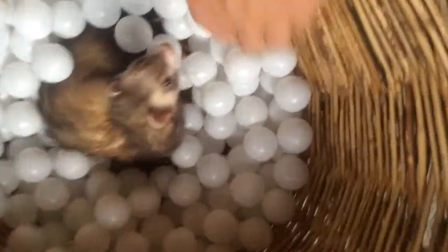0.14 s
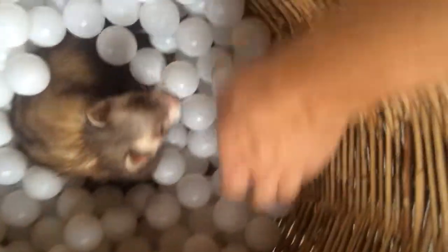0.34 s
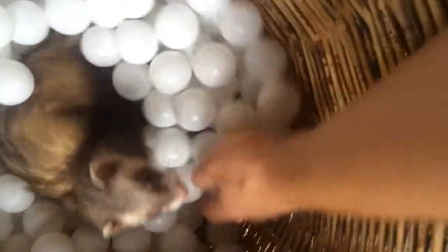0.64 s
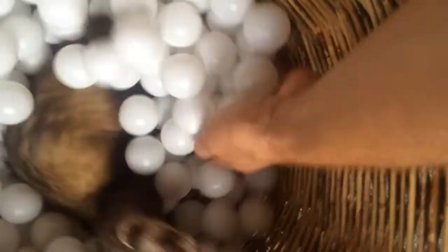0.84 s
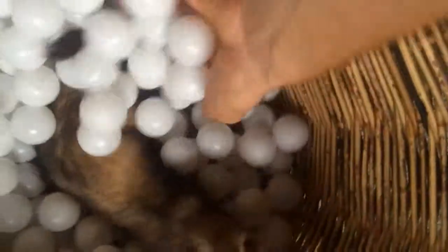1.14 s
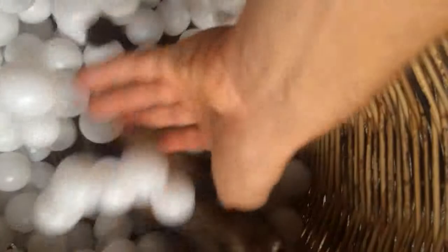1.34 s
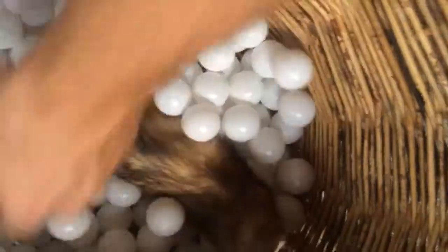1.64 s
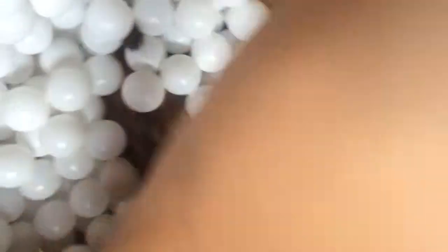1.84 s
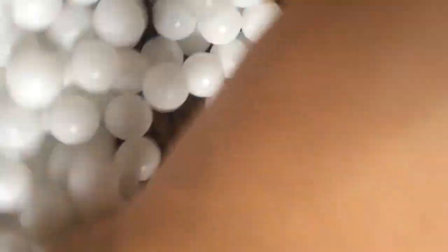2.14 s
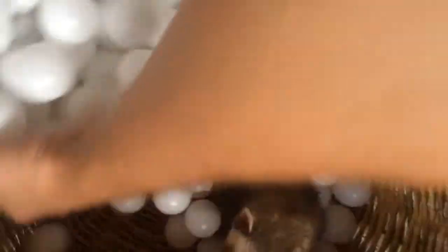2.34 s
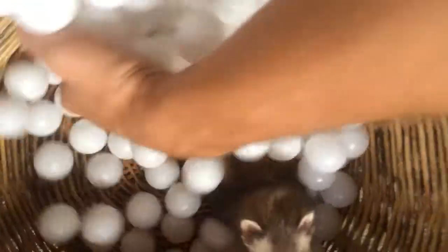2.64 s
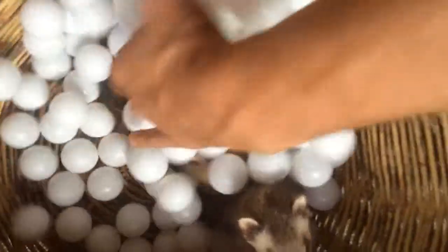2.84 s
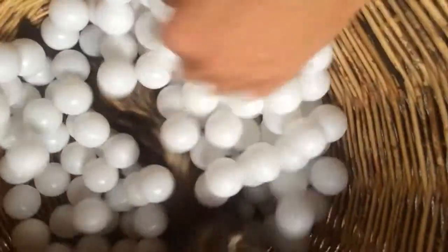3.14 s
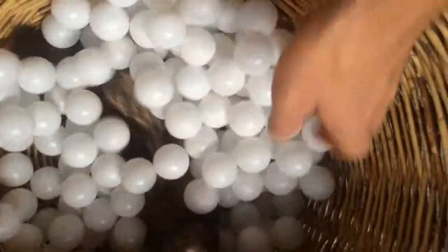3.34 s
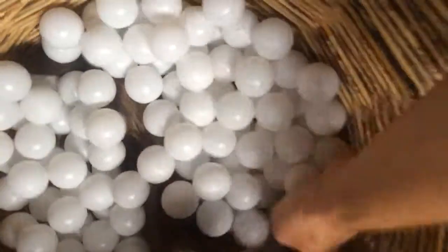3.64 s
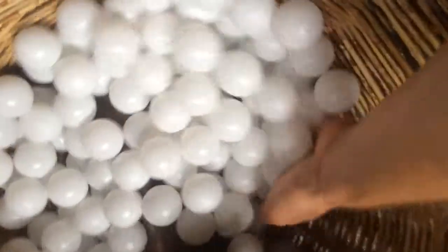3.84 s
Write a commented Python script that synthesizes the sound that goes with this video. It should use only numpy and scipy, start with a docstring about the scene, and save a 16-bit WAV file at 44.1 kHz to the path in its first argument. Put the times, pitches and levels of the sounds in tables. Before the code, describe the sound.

Hollow plastic balls, nearly quiet at first, then clatter and scrape in a dense rattle as a hand stirs them in a wicker basket; close microphone, small quiet room with short reflections.

```python
"""Hollow plastic balls knock and scrape as a hand stirs them in a wicker basket, close by, in a small room.
Each collision is a knock of about two cycles (damped body modes) with a brief high ring of the thin shell.
Between knocks the balls scrape in tiny slips: random impulses through a fixed colour.
Now and then a clump gives way and tumbles, or one ball scuffs its neighbour; one squeak rises briefly.
The basket thuds faintly (coloured noise); basket and room reflect the balls, over quiet room tone."""
import sys
import numpy as np
from scipy import signal
from scipy.io import wavfile
from scipy.ndimage import uniform_filter1d

SR = 44100
rng = np.random.default_rng(int(sys.argv[2]) if len(sys.argv) > 2 else 0)


def master(y):
    """Save y as 16-bit WAV."""
    cut = np.clip(np.atleast_2d(y).T, -1, 1)
    pcm = np.round(cut * 32767)  # scale
    wavfile.write(sys.argv[1], SR, pcm.astype(np.int16))


N = 176400  # samples, 4 s

# Room tone spectrum. Each row: frequency in Hz, relative level in dB.
ROOM_TONE_COLOUR = [(20, -30), (60, -12), (185, -3), (270, -12), (800, -5), (1300, -18), (3300, -21.5),
                    (5200, -31), (9000, -22), (15500, -31)]
ROOM_TONE_RMS_DB = -58.5

# Basket thudding over time. Each row: time in seconds, level in dB.
THUD_LEVEL = [(0, -59.5), (.48, -59), (.75, -56), (1.6, -54), (2.06, -55), (2.105, -44), (2.25, -58),
              (2.6, -53), (3.4, -57), (3.56, -65), (3.7, -58), (4, -59)]
# Basket thud spectrum. Each row: frequency in Hz, relative level in dB.
THUD_SPECTRUM = [(20, -16), (42, -24), (60, 3.5), (85, -6.5), (125, -1), (200, -2.5), (400, -31),
                 (2000, -57)]

# Reflections: level in dB, decay by 60 dB in seconds, first delay in seconds.
BASKET_DB, BASKET_T60_S, BASKET_DELAY_S = -8, 0.1, 0.0015
ROOM_DB, ROOM_T60_S, ROOM_DELAY_S = -12.5, 0.19, 0.013
WANDER_S = 0.02  # the balls move, so their reflections keep changing

# How hard the pile is stirred. Each row: time in seconds, knocking level in dB, scraping level in dB.
STIRRING = [(0, -51.5, -54), (.11, -58, -52.5), (.17, -50.5, -57), (.24, -62, -66), (.51, -64, -71),
            (.522, -41, -45.5), (.565, -34, -37.5), (.68, -32.5, -32.5), (.8, -31.5, -29.5),
            (.92, -30, -33.5), (1.18, -32, -32), (1.33, -32.5, -38), (1.41, -35.5, -40.5), (1.49, -40, -42),
            (1.54, -38.5, -47), (1.59, -31.5, -36.5), (1.69, -40.5, -42.5), (1.79, -51, -56.5),
            (1.86, -49, -48), (1.945, -37, -41), (1.98, -27.5, -30), (2.04, -31, -40), (2.08, -34.5, -41.5),
            (2.125, -24, -23), (2.2, -23, -24), (2.28, -29.5, -25), (2.33, -31, -30), (2.52, -31.5, -34),
            (2.66, -34, -30), (2.92, -33, -34.5), (3.06, -32, -36), (3.19, -31.5, -31.5),
            (3.32, -30, -34.5), (3.45, -37, -41), (3.55, -44, -49.5), (3.625, -47, -50.5),
            (3.67, -34.5, -38), (3.71, -28.5, -38.5), (3.82, -34.5, -34.5), (3.94, -36, -34),
            (4, -25.5, -37)]
# Clumps of balls giving way. Each row: start in seconds, level in dB, length in seconds.
CLUMP_TUMBLES = [(0.125, -53, 0.034), (0.558, -33.5, 0.013), (1.245, -28, 0.0089), (1.354, -35.5, 0.036),
                 (1.4225, -31.5, 0.006), (1.505, -27.5, 0.017), (1.547, -27.5, 0.013), (1.564, -22, 0.011),
                 (1.83, -33.5, 0.0073), (2.265, -27.5, 0.012), (2.411, -27.5, 0.0076), (2.679, -31, 0.0074),
                 (2.782, -27.5, 0.0076), (2.884, -28, 0.011), (3.084, -29, 0.013), (3.115, -26, 0.0089),
                 (3.224, -29.5, 0.0067), (3.632, -35, 0.0081), (3.649, -31.5, 0.0083),
                 (3.685, -28.5, 0.0085)]
# One ball scuffing along its neighbour. Each row: start in seconds, level in dB, length in seconds.
BALL_SCUFFS = [(.043, -55, 0.0089), (.064, -47.5, 0.016), (.1215, -36.5, 0.0095), (.153, -48, 0.015),
               (.294, -53, 0.015), (.421, -58, 0.0039), (.994, -23, 0.0053), (1.009, -26.5, 0.0032),
               (1.075, -32, 0.0041), (1.18, -26, 0.0033), (1.594, -36, 0.007), (2.413, -23, .004),
               (2.642, -28, 0.004), (2.835, -25.5, 0.0022), (2.953, -25.5, 0.0076), (3.224, -30.5, 0.0065)]
SURGE_RISE = 0.25  # swell, as a share of the surge length
TUMBLE_SCRAPE_DB = -1.5  # scraping relative to knocking in a tumble

# Contact rates at full stir.
FULL_STIR_DB, KNOCKS_PER_S, SLIPS_PER_S = -29.5, 950, 6000
CROWDING = 0.7  # contact rate grows as this power of the stirring amplitude
KNOCK_SCATTER_DB, SLIP_SCATTER_DB, SLIP_CLUMP_DB = 2, 2, 3

SQUEAK_START_S, SQUEAK_LENGTH_S, SQUEAK_PEAK_DB = 3.483, 0.009, -35
SQUEAK_MID_HZ, SQUEAK_RISE = 3200, 0.1  # rise as a share of the middle frequency

# Modes of a reference ball's hollow body, retuned for each ball.
# Each row: frequency in Hz, level in dB, swell time in seconds.
BODY_MODES = [(1020, -2.5, .0009), (1850, -13, .0005)]
BODY_HZ, BODY_SWELL_S = BODY_MODES[0][0], BODY_MODES[0][2]
# Ring of its thin shell before retuning. Each row: frequency in Hz, level in dB, swell time in seconds.
SHELL_MODES = [(2870, -10, 0.00046), (3660, -11, 0.000589), (7170, -11.5, 0.001265), (8540, -8.5, 0.001055),
               (11160, -8.5, 0.00092), (14300, -19, 0.0011)]
PILE_SHELL_TUNE, OPEN_SHELL_TUNE = 0.97, 0.94
BODY_SPREAD_LOG, SHELL_SPREAD_LOG = 0.33, 0.058  # scatter of log pitch
PILE_MODE_SCATTER_DB, OPEN_MODE_SCATTER_DB = 6, 1
RING_STRETCH = 0.74  # swell and decay times shrink as this power of the tuning ratio

# Typical pitch of knocks within the pile. Each row: time in seconds, frequency in Hz.
PILE_PITCH = [(0, 780), (.45, 691), (.8, 902), (1.15, 964), (1.55, 1088), (1.8, 805), (2.2, 991),
              (2.8, 1149), (3.25, 1085), (3.58, 850), (3.7, 1013), (4, 1023)]
LOWEST_HZ, HIGHEST_HZ = 320, 1750
PILE_RING_DB = -5
HARDNESS = 0.1  # shell ring grows as this power of the knock's pitch
SOFTNESS = 0.31  # gentle contacts are duller: shell ring grows as this power of the stirring amplitude
# Colour of knocks from within the pile. Each row: frequency in Hz, gain in dB.
PILE_COLOUR = [(25, -24), (130, -4.5), (250, 0), (550, -0.5), (900, -0.5), (1300, -.5), (1900, -3.5),
               (3000, 0), (5300, -16.5), (7200, -5), (11000, -5), (15500, -27)]
# Colour of scraping. Each row: frequency in Hz, gain in dB.
SCRAPE_COLOUR = [(100, -14.5), (900, 1.5), (3000, -3.5), (4400, -7.5), (5500, -11), (6300, -7.5),
                 (7200, 2.5), (8100, -7), (9000, -2), (10700, -4), (12000, -7.5), (13300, -19.5),
                 (14400, -11.5), (15500, -28.5)]

# Single clear knocks. Each row: start in seconds, level in dB, pitch in Hz,
# shell ring in dB before the common ring and grit offsets.
CLEAR_KNOCKS = [(.1335, -27.5, 840, -9), (.1589, -38, 820, 0), (0.173, -40, 790, -14),
                (0.2024, -36, 920, -8), (.2275, -42, 780, -12), (0.4212, -37, 756, -6),
                (.4564, -44, 805, -8), (0.476, -39, 805, -9), (0.574, -16, 894, -4), (0.9508, -21, 715, -6),
                (1.041, -19, 700, -12), (1.0758, -17, 775, -1), (1.1056, -16.5, 1020, -2),
                (1.176, -20, 1040, -6), (1.185, -15, 965, -0.5), (1.248, -16.5, 1110, -1),
                (1.258, -18, 1030, -17), (1.3633, -22, 1080, -12), (1.3709, -19, 1120, 5.5),
                (1.381, -23, 1040, -12), (1.4245, -14, 780, -13), (1.4361, -17.5, 1440, -9),
                (1.4845, -26.5, 1090, 8.5), (1.513, -11, 1020, -8), (1.533, -27.5, 1090, 10),
                (1.5803, -8, 970, -4), (1.5937, -21, 1120, -3), (1.6391, -12.5, 990, -23),
                (1.6537, -15.5, 1020, -3.5), (1.8118, -29, 930, 0), (1.837, -21, 930, -3),
                (1.8548, -30, 740, -6), (1.8838, -18.5, 1070, -2.5), (1.9563, -19, 1040, -2),
                (2.0263, -22, 880, -11), (2.0341, -18, 990, -13), (2.2643, -12, 1160, -3),
                (2.6182, -17, 1110, 2), (2.6443, -21.5, 1130, 4), (2.6838, -19.5, 1190, 11.5),
                (2.7868, -11, 1240, -4), (2.819, -20, 1200, -14), (2.841, -14, 1260, 1.5),
                (2.8935, -12, 1300, 2.5), (2.9533, -20.5, 1080, 1), (2.9755, -17.5, 1100, 6),
                (3.0083, -19.5, 1140, 2.5), (3.037, -20.5, 1020, 4), (3.144, -15, 1300, -16),
                (3.1842, -16, 880, -14), (3.2052, -16, 1310, 3), (3.4428, -26, 820, -2),
                (3.482, -22.5, 1010, 2), (3.53, -34, 573, -10), (3.6395, -24, 960, -12),
                (3.6495, -17.5, 950, -4), (3.655, -16, 1000, -9), (3.6875, -17, 950, -13),
                (3.699, -9.5, 1110, -10), (3.7133, -19, 1110, -9), (3.776, -18.5, 1050, -6),
                (3.9686, -13, 1230, -8)]
OPEN_RING_DB, GRIT_DB, GRIT_S = -4, -10, 0.0021  # a clear knock's shell ring and gritty slip

BAND_LIMIT_HZ = 15450


def amp(db):
    """Decibels to amplitude gain."""
    return 10 ** (np.asarray(db) / 20)


def unit(x):
    """Scales to rms 1."""
    return x / np.sqrt(np.mean(x ** 2) + 1e-20)


def curve(table, axis=1):
    """One column of a time table, interpolated at every sample."""
    rows = np.array(table)
    return np.interp(np.arange(N) / SR, rows[:, 0], rows[:, axis])


def add(mix, start_s, sound):
    """Mixes a sound into mix, in place, from start_s."""
    part = mix[max(round(start_s * SR), 0):][:len(sound)]
    part += sound[:len(part)]


def colour(x, points, size=4096):
    """Causal minimum-phase filter with the given (Hz, dB) response."""
    table_hz, table_db = np.transpose(points)
    bin_hz = abs(np.fft.fftfreq(size, 1 / SR))
    gain_db = np.interp(np.log(bin_hz + 1), np.log(table_hz), table_db)
    log_gain = np.log(amp(gain_db))
    spectrum = np.exp(np.conj(signal.hilbert(log_gain)))
    taps = np.fft.ifft(spectrum).real[:size // 2]
    return signal.oaconvolve(x, taps)[:N]


def room_tone():
    """Steady coloured noise of the quiet room."""
    return amp(ROOM_TONE_RMS_DB) * unit(colour(rng.standard_normal(N), ROOM_TONE_COLOUR))


def basket():
    """The shifting load thuds dully on the wicker: low noise under a level curve."""
    return amp(curve(THUD_LEVEL)) * unit(colour(rng.standard_normal(N), THUD_SPECTRUM))


def echoes(x, t60_s, delay_s, size=12000, count=7):
    """Sparse dying reflections; the sound passes in turn through several reflection patterns."""
    t = np.arange(size) / SR
    decay = (t > delay_s) * np.exp(-np.log(1000) * t / t60_s)
    turn = np.arange(N) / SR / WANDER_S
    out = np.zeros(N)
    for k in range(count):
        taps = rng.choice([-1, 1], size) * (rng.random(size) < 0.1) * decay
        # Overlapping half-sine windows keep the power constant.
        window = np.sin(np.pi / 2 * np.minimum((turn - k) % count, 2))
        out += signal.oaconvolve(x * window, taps / np.linalg.norm(taps))[:N]
    return out


def surges(table):
    """Level of short surges of contacts that swell and soon stop."""
    level = np.zeros(N)
    for start_s, db, length_s in table:
        u = np.arange(0, 2, 1 / (length_s * SR))
        add(level, start_s, amp(db) * np.minimum(u / SURGE_RISE, 1) * np.exp(-u ** 4))
    return level


def contacts(level, per_s, scatter_db):
    """Random impulses of about the given rms level: harder stirring makes more and stronger ones."""
    rate = per_s * (level / amp(FULL_STIR_DB)) ** CROWDING
    chance = np.minimum(rate / SR, 1)
    size = unit(amp(scatter_db * np.clip(rng.standard_normal(N), -3, 1.5)))
    struck = rng.random(N) < chance
    return struck * rng.choice([-1, 1], N) * size * level / np.sqrt(chance)


def squeak():
    """One brief rising stick-slip squeak of plastic: a swept sine under a half-sine envelope."""
    u = np.arange(0, 1, 1 / (SQUEAK_LENGTH_S * SR))
    turns = np.cumsum(SQUEAK_MID_HZ * (1 + SQUEAK_RISE * (u - 0.5))) / SR
    out = np.zeros(N)
    add(out, SQUEAK_START_S, amp(SQUEAK_PEAK_DB) * np.sin(np.pi * u) * np.sin(2 * np.pi * turns))
    return out


def scrape(level, size=260):
    """Clumps of tiny slips between shells, heard mostly as their high ring."""
    drift = unit(uniform_filter1d(rng.standard_normal(N), size))
    clumps = unit(amp(SLIP_CLUMP_DB * drift))
    slips = contacts(level * clumps, SLIPS_PER_S, SLIP_SCATTER_DB)
    return unit(colour(slips, SCRAPE_COLOUR)) * np.std(slips)


def ring(modes, tune, scatter_db, size=512):
    """Heavily damped modes that swell during the contact and die within a few cycles."""
    t = np.arange(size) / SR
    out = np.zeros(size)
    scatter = np.clip(rng.standard_normal((len(modes), 2)), -1.5, 1.5)
    for (hz, db, swell_s), (level_dev, pitch_dev) in zip(modes, scatter):
        top_s = swell_s / tune ** RING_STRETCH
        hump = (t / top_s * np.exp(1 - t / top_s)) ** 2
        mode_hz = hz * tune * np.exp(SHELL_SPREAD_LOG * pitch_dev)
        wave = np.sin(2 * np.pi * mode_hz * (t - top_s))
        wave = wave - np.average(wave, weights=hump)  # no net offset
        out += amp(db + scatter_db * level_dev) * hump * wave
    return out


def rattle(level, count=64):
    """Many slightly different balls knocking inside the pile; harder contacts are brighter."""
    hits = contacts(level, KNOCKS_PER_S, KNOCK_SCATTER_DB)
    pitches_hz = np.geomspace(LOWEST_HZ, HIGHEST_HZ, count)
    wanted_hz = curve(PILE_PITCH) * np.exp(BODY_SPREAD_LOG * rng.standard_normal(N))
    ball = np.searchsorted(pitches_hz[:-1], wanted_hz)
    bodies, shells = [], []
    for tune in pitches_hz / BODY_HZ:
        bodies.append(ring(BODY_MODES, tune, 0) * tune ** (RING_STRETCH / 2))
        shell = ring(SHELL_MODES, PILE_SHELL_TUNE, PILE_MODE_SCATTER_DB)
        shells.append(amp(PILE_RING_DB) * tune ** HARDNESS * shell)
    bright = (level / amp(FULL_STIR_DB)) ** SOFTNESS
    out = np.zeros(N)
    for i in np.flatnonzero(hits):
        sound = bodies[ball[i]] + bright[i] * shells[ball[i]]
        add(out, i / SR, hits[i] * sound / np.linalg.norm(sound))
    return colour(out, PILE_COLOUR)


def knocks(size=400):
    """Balls striking in the open on top of the pile, each in a gritty slip that starts before the blow."""
    out, grit = np.zeros(N), np.zeros(N)
    slip = np.exp(-((np.arange(size) - size / 2) / SR / GRIT_S) ** 2)
    for start_s, db, hz, ring_db in CLEAR_KNOCKS:
        body = ring(BODY_MODES, hz / BODY_HZ, 0)
        shell = amp(ring_db + OPEN_RING_DB) * ring(SHELL_MODES, OPEN_SHELL_TUNE, OPEN_MODE_SCATTER_DB)
        add(out, start_s, amp(db) * (body + shell))
        slip_noise = amp(db + ring_db + GRIT_DB) * slip * rng.standard_normal(size)
        add(grit, start_s + BODY_SWELL_S - size / 2 / SR, slip_noise)
    return out + colour(grit, SCRAPE_COLOUR)


def scene():
    """The stirred pile with reflections from basket and room, over thuds and quiet room tone."""
    tumbling = surges(CLUMP_TUMBLES)
    knocking = np.hypot(amp(curve(STIRRING)), tumbling)
    extra_scraping = amp(TUMBLE_SCRAPE_DB) * tumbling + surges(BALL_SCUFFS)
    scraping = np.hypot(amp(curve(STIRRING, axis=2)), extra_scraping)
    balls = knocks() + rattle(knocking) + scrape(scraping) + squeak()
    basket_echo = amp(BASKET_DB) * echoes(balls, BASKET_T60_S, BASKET_DELAY_S)
    room_echo = amp(ROOM_DB) * echoes(balls, ROOM_T60_S, ROOM_DELAY_S)
    return (balls + basket_echo + room_echo + basket() + room_tone())[None]


def record(dry):
    """The recorder's band limit: a linear-phase low-pass."""
    taps = signal.firwin(511, BAND_LIMIT_HZ, window=("kaiser", 9), fs=SR)
    return signal.oaconvolve(dry, taps[None], "same")


dry = scene()
out = record(dry)
master(out)
```